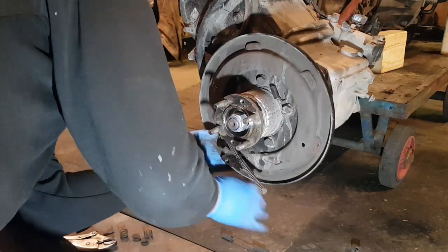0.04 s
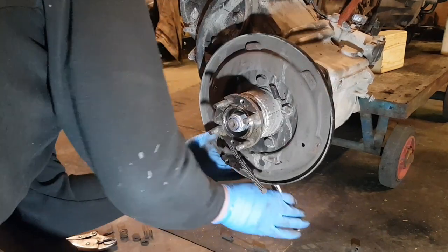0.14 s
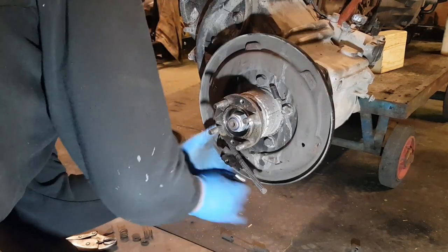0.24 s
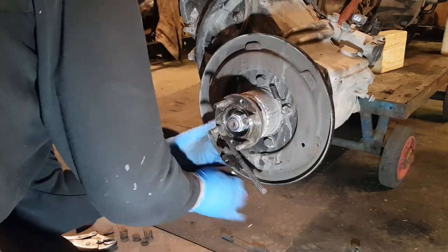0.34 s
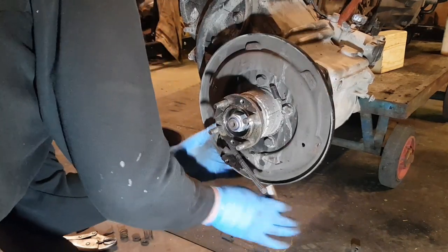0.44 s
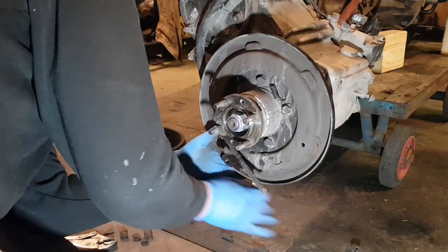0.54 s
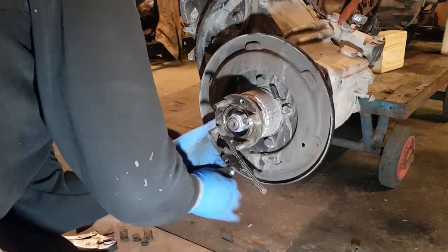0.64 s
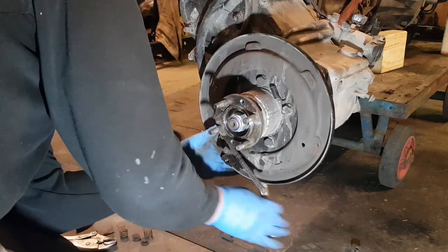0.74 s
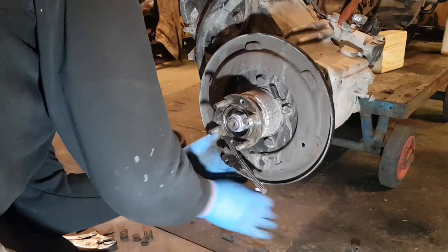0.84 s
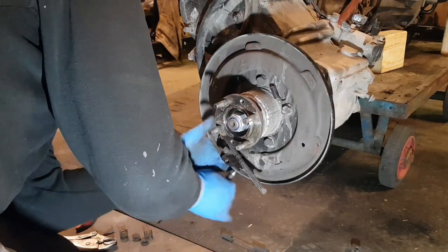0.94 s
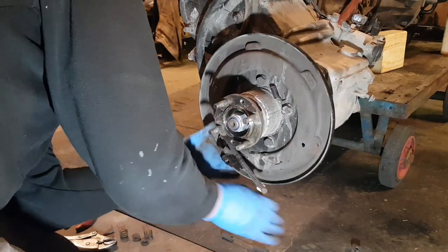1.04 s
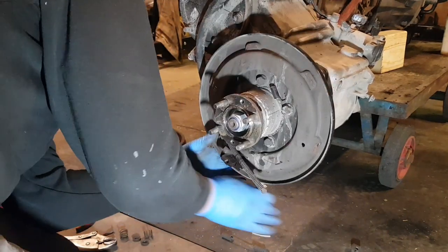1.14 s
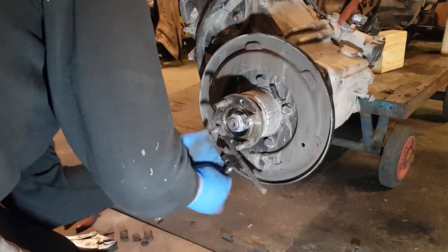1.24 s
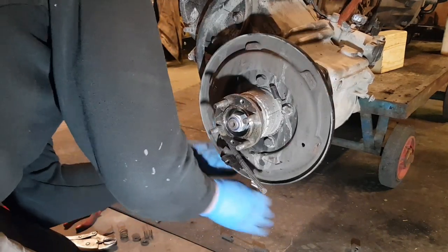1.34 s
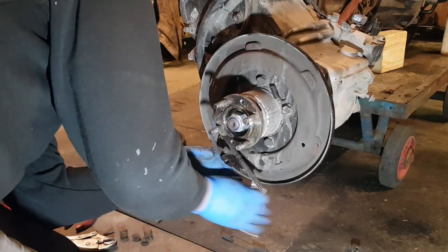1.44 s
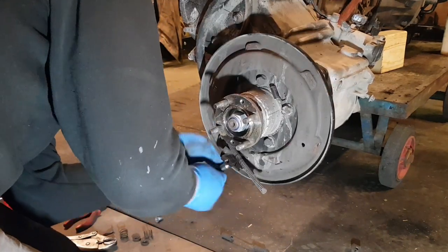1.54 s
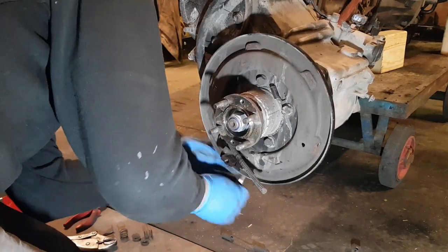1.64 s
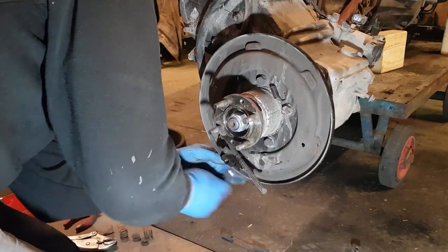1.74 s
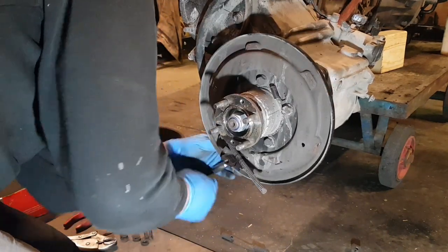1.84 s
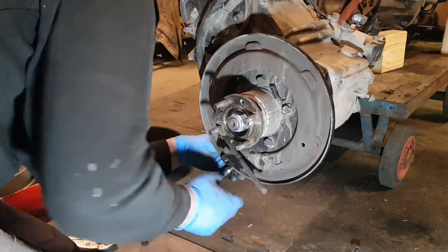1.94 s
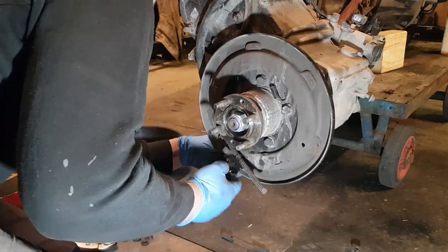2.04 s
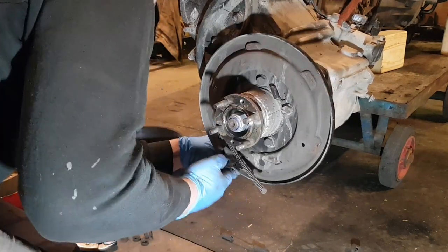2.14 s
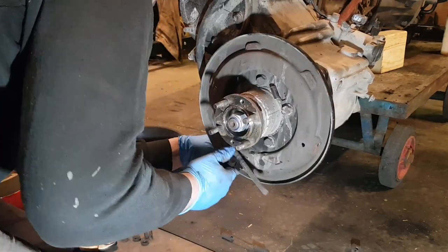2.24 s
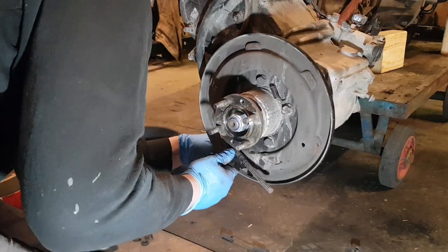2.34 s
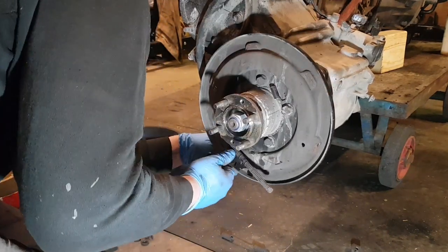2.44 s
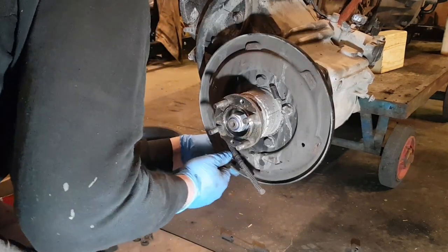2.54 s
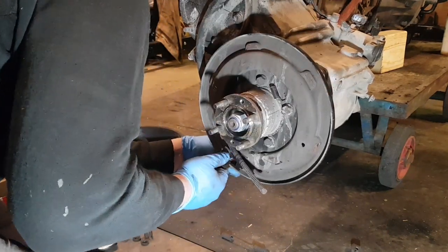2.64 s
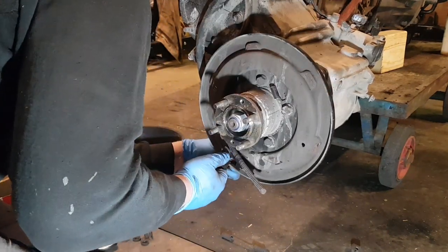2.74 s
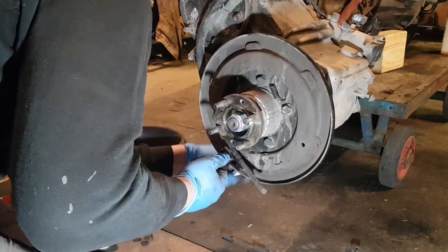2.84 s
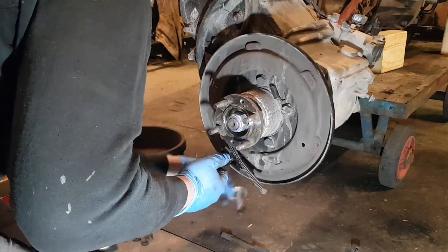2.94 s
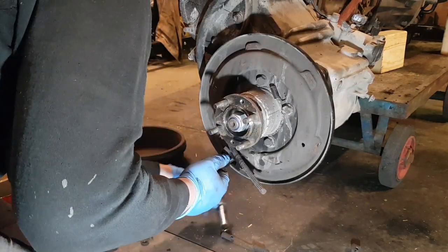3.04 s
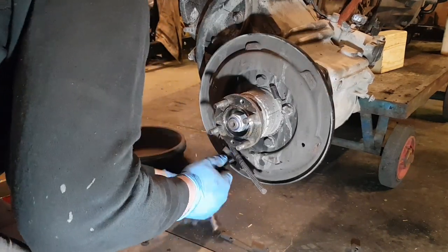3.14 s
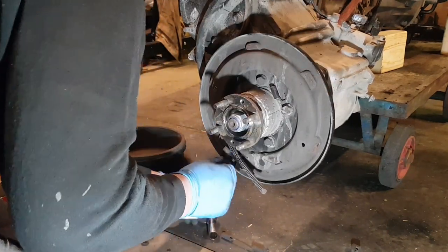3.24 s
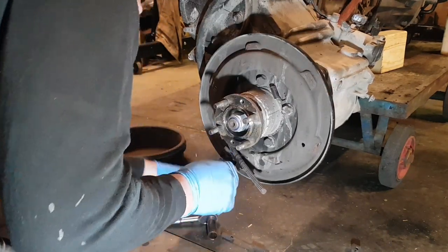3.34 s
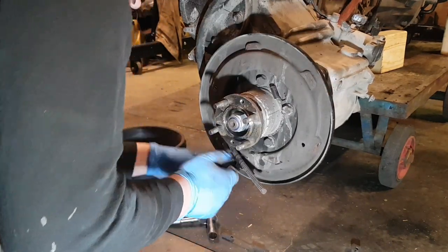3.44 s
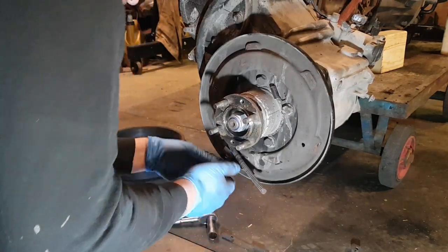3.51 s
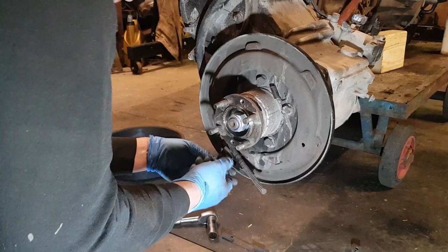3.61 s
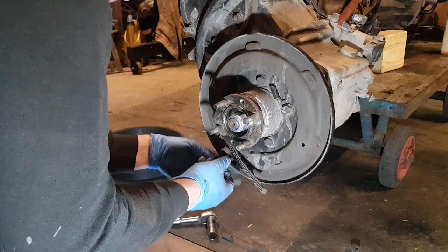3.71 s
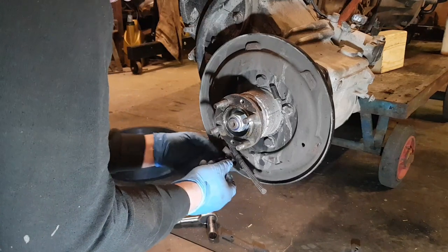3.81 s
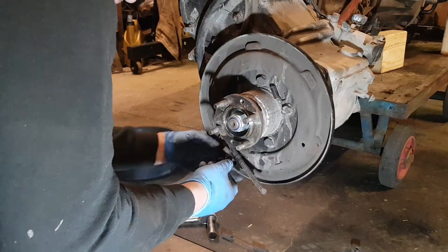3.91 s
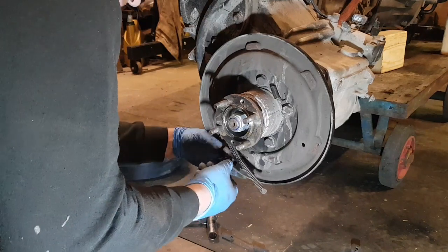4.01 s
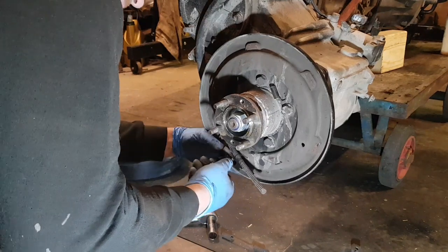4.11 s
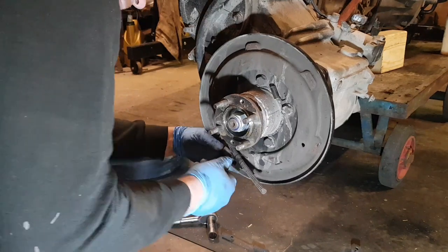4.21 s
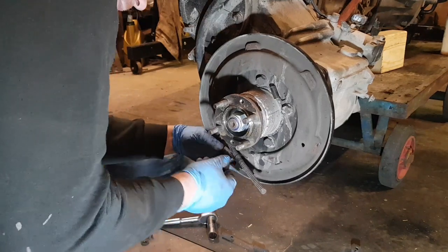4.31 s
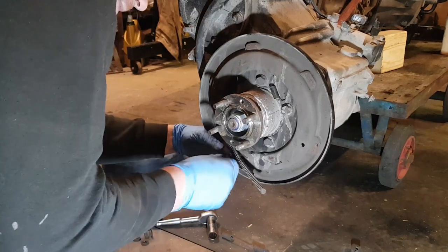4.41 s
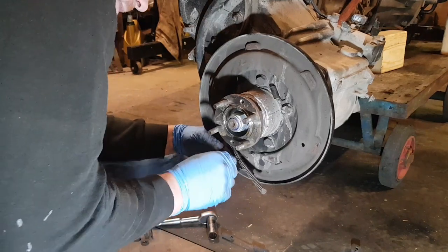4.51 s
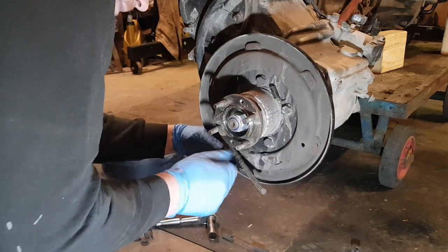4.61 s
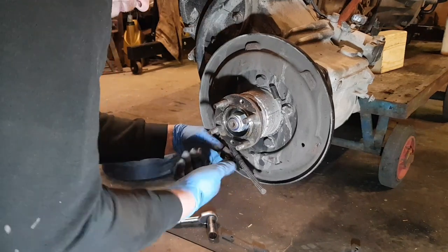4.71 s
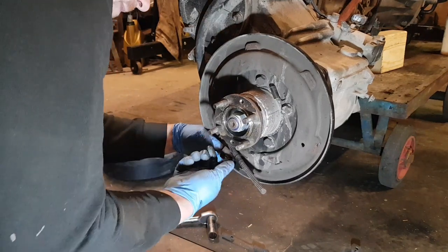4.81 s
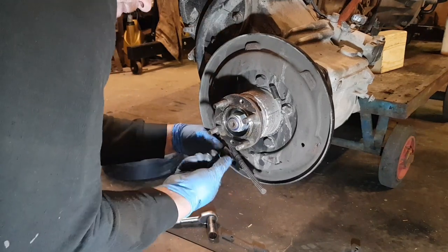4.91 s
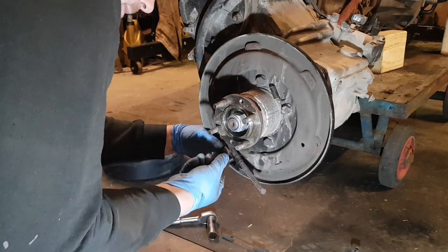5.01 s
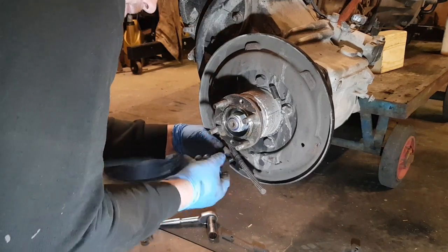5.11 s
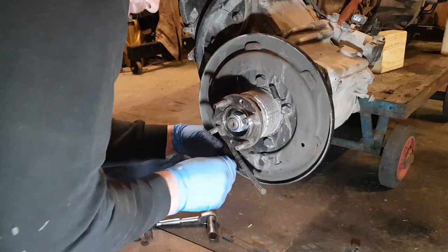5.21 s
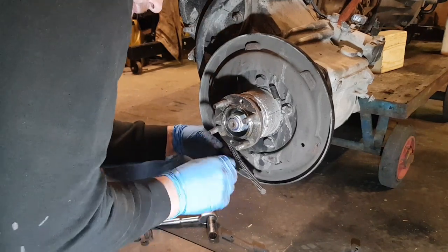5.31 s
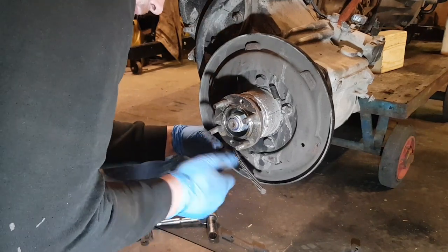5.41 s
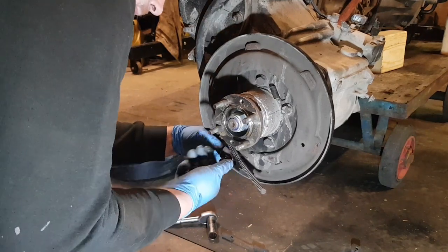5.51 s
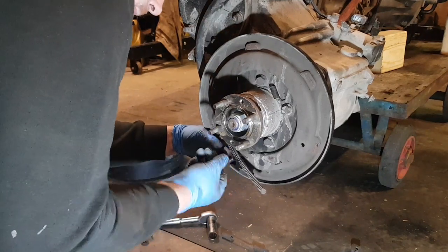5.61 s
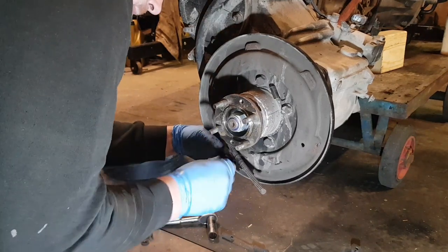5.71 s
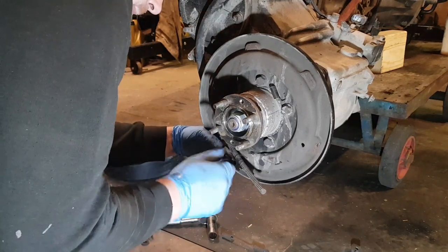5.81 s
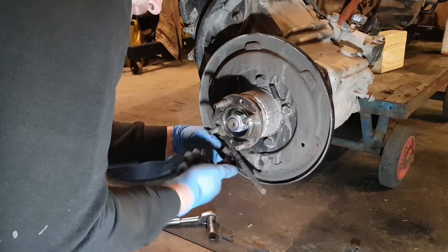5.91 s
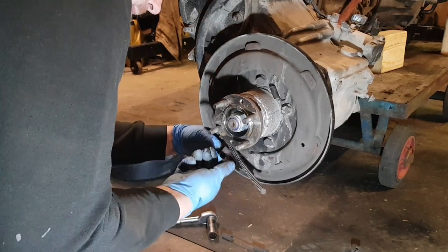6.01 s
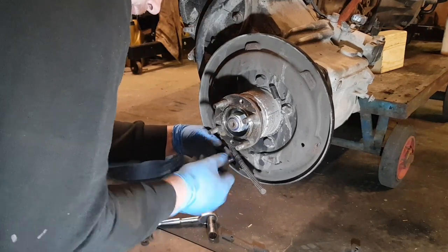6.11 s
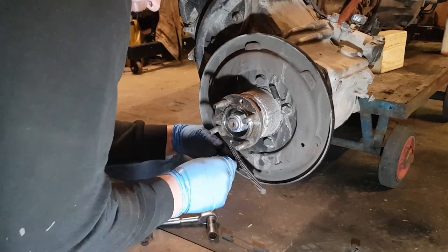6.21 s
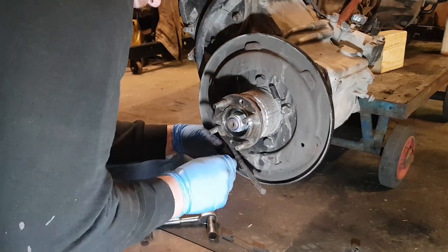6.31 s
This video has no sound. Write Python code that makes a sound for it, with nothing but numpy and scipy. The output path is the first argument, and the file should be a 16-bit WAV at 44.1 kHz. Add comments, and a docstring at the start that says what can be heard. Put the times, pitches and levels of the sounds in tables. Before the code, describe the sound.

Uneven steel knocks and short rusty scrapes come first, mixed with rubbing rubber gloves and small snaps. A tight creak climaxes in the hardest knock, then a thin ringing slip. After a short lull the heavy tool clatters down on the concrete floor. Lesser clicks follow, fading into light fingering and soft rustles. Close stereo microphone, short garage reverberation, steady low building rumble and faint hum beneath.

```python
"""A drum brake in a garage, heard close in stereo and slightly to the right, over a low rumble and a faint hum.
First a gloved hand works a spanner on the stiff adjuster: knocks and scrapes ring the steel back plate's modes.
The thread creaks in thin resonances, the plate hoots, and the spanner slips off with a ping of its own modes.
It is laid on the concrete floor with thuds, rattles and clashes of shaped noise; a few lesser knocks follow.
Then fingers turn the adjuster quietly. Gloves rustle throughout in fine grains, sleeves now and then in dull noise."""
import sys
import numpy as np
from scipy import signal
from scipy.fft import rfft, irfft, next_fast_len
from scipy.io import wavfile

SR = 44100
rng = np.random.default_rng(int(sys.argv[2]) if len(sys.argv) > 2 else 0)


def transcribe(signal):
    """Save signal, clipped to [-1, 1], as a 16-bit WAV file at the path in sys.argv[1]."""
    frames = np.atleast_2d(signal).T
    limited = np.clip(frames, -1, 1)
    pcm = np.round(limited * 32767).astype(np.int16)
    wavfile.write(sys.argv[1], SR, pcm)


N = 280035
TIME = np.arange(N) / SR   # seconds
CUTOFF_HZ = 15600
CLONK_HZ = 778   # the plate's main mode
SWELL_SHAPE = 1.3   # a movement swells and fades as a half sine raised to this power
FINGERING_BRIGHT_DB = 6   # light fingertips sound thinner: taken off the lows and added to the highs

# All spectra are relative.
# Room rumble running out into faint hiss. Each row: frequency in Hz, density in dB per Hz.
RUMBLE = [(15, -45.5), (28, -25.5), (40, -14.5), (58, 0.5), (80, -9), (110, -3), (140, -19), (200, -22),
          (300, -28.5), (500, -35), (800, -36), (1200, -44.5), (2000, -46), (5000, -59.5), (9000, -55),
          (12500, -53), (16000, -59)]
# The rumble comes up at first, then holds. Each row: time in seconds, relative level in dB.
RUMBLE_DB = [(0.0, -55.5), (0.75, -51), (3.3, -50.5), (6.35, -51.5)]
# Two hum tones, lower and upper. Each row: frequency in Hz, level in dB.
HUM = [(62.5, -59.5), (161, -68.5)]
# Swells of the upper hum. Each row: start in seconds, end in seconds, level in dB relative to its HUM row.
HUM_SWELLS = [(2.05, 2.37, 12), (4.2, 4.55, 8.5), (5.75, 6.02, 16.5), (6.05, 6.35, 11.5)]
# How alike the two channels are. Each row: frequency in Hz, left-right correlation.
LIKENESS = [(30, 1), (100, 0.96), (250, .8), (700, 0.51), (2000, 0.026), (5000, 0), (14000, 0.15)]
# The garage's decay. Each row: frequency in Hz, t60 in seconds.
GARAGE = [(150, 0.34), (500, 0.38), (1500, 0.35), (4000, 0.41), (14000, 0.21)]

# Dull, low rustle. Each row: frequency in Hz, density in dB per Hz.
CLOTH = [(60, -16.5), (130, 1.5), (200, -1), (320, -4.5), (600, -19.5), (1500, -32), (6000, -51)]
# Dull low swells: sleeves shifting, and at 3.12-3.48 s the low body of the tool's landing.
# Each row: start in seconds, end in seconds, level in dB.
DULL_SWELLS = [(0.75, 1.75, -56), (3.12, 3.48, -53.5), (4.3, 4.75, -65.5), (4.75, 5.15, -63.5),
               (5.7, 6.15, -68)]
SLEEVE_REST_DB = -76.5

# Rubbing glove rubber. Each row: frequency in Hz, density in dB per Hz.
RUSTLE = [(300, -8.5), (1000, -6.5), (2500, -2), (3700, -1.5), (4800, 2), (7000, 0.5), (9500, 0),
          (12000, 1.5), (14500, -3.5), (16000, 2.5)]
# The gloves' constant light rubbing wavers while the spanner is worked and drops once it is off.
# Each row: time in seconds, relative level in dB.
GRIP = [(0.0, -59.5), (0.7, -62.5), (1.1, -58.5), (1.8, -60), (2.55, -62), (2.75, -75), (3.1, -70),
        (3.5, -65.5), (4.2, -71), (6.35, -72)]
# Fingers slide to a new grip without moving the steel.
# Each row: start in seconds, end in seconds, relative level in dB.
REGRIPS = [(0.223, 0.354, -60.5), (1.795, 1.966, -60.5), (2.147, 2.259, -55), (2.548, 2.6, -54),
           (3.9, 4.058, -62.5), (5.29, 5.483, -67), (5.84, 5.973, -55.5)]
# Glove rubber snaps. Each row: time in seconds, relative level in dB.
SNAPS = [(0.747, -38), (1.3573, -36), (1.3862, -32), (1.6095, -44.5), (2.046, -43), (2.0763, -41),
         (2.0897, -30), (4.306, -46), (4.9167, -48), (4.941, -51.5), (5.3689, -51)]

# The tool lands on the floor. Each row: time in seconds, then thud, rattle and bright clash in relative dB.
DROPS = [(3.119, -34, -38.5, -69), (3.210, -21, -36.5, -47.5), (3.220, -29, -40, -50),
         (3.326, -30.5, -31, -38.5), (3.397, -54, -52.5, -61)]
# Dull blow on the floor. Each row: frequency in Hz, density in dB per Hz.
THUD = [(100, -11.5), (200, -10), (400, -10.5), (620, 5), (950, 2.5), (1250, 0.5), (1700, -11), (2500, -10),
        (4000, -49.5), (8000, -55.5)]
# Loose parts of the tool. Each row: frequency in Hz, density in dB per Hz.
RATTLE = [(90, -5), (200, 6), (330, -0.5), (500, 8.5), (1400, 7), (2800, -2), (4000, -8.5), (6200, -11),
          (7200, -35), (14000, -41.5)]
# Their bright clash. Each row: frequency in Hz, density in dB per Hz.
CLASH = [(1000, -19.5), (3500, -19), (5000, -29), (7000, 0), (9000, -3), (12000, 3.5), (14000, -2.5),
         (16000, -11)]
# Steel meeting concrete. Each row: frequency in Hz, density in dB per Hz.
TICK = [(300, -5.5), (1000, 8), (2500, 6.5), (4000, -11.5), (6300, -4), (7200, -37), (14000, -26)]
# The heavy tool's damped modes as it lies on the floor.
# Each row: frequency in Hz, relative level in dB, t60 in seconds, left-right difference in dB.
TOOL = [(220, -21.5, 0.2, -6), (528, -8, 0.088, -6.5), (619, -13.5, 0.33, -6.5), (724, -3.5, 0.077, 0),
        (957, -10, 0.15, 3), (1181, -20, 0.2, -1), (1290, -15.5, 0.2, -5.5), (1410, -5, 0.086, 1)]

# The spanner springs free. Each row: time in seconds, relative level in dB.
SLIP = [(2.7934, -31.5)]
# The free spanner's modes.
# Each row: frequency in Hz, relative level in dB, t60 in seconds, left-right difference in dB.
SPANNER = [(1491, -9, .12, -2), (1782, -18, .2, -2), (2520, -9, .16, -2), (2799, -12, .12, -2),
           (2918, -6, .06, -2), (3076, -2, .1, -3), (3488, -12, .19, -2), (3720, -14, .07, -2),
           (4468, -22, .12, -2), (4597, -19, .17, -2), (7074, -29, .14, 0)]
# The slip's dense ring. Each row: frequency in Hz, density in dB per Hz.
PING = [(500, -19), (1000, -18.5), (1600, -5), (2100, -6), (3000, 3.5), (3700, -3), (4200, -17),
        (4700, -5.5), (5300, -30), (7200, -49), (9000, -37)]

# Friction locks on to the plate's main mode.
# Each row: start in seconds, end in seconds, pitch in Hz, relative level in dB.
GROANS = [(2.559, 2.59, 802, -27), (2.612, 2.652, 782.5, -29), (4.091, 4.14, 795.3, -41.5)]
# The adjuster binds and creaks under load. Each row: time in seconds, level in dB.
CREAK = [(2.43, -83.5), (2.47, -58.5), (2.53, -55.5), (2.57, -51), (2.60, -65.5), (2.635, -52.5),
         (2.68, -89.5)]
# Thin resonances of the creak. Each row: frequency in Hz, relative level in dB, t60 in seconds.
CREAK_MODES = [(3400, -6, .03), (5910, -2.5, 0.015), (6900, -10, 0.046), (9650, -10, .03),
               (14280, -6.5, .012)]

# Each stroke of the hand slides steel on the adjuster and drags the glove with it. Each row: start in seconds,
# end in seconds, body in relative dB, grit in relative dB, favoured pitch in Hz, glove in relative dB.
STROKES = [(0.069, 0.177, -45.5, -53.5, 3400, -52), (0.374, 0.518, -47, -51, 1490, -54.5),
           (0.545, 0.673, -51, -56.5, 2430, -57), (0.704, 0.847, -43.5, -54, 3010, -50.5),
           (0.843, 1.01, -54, -66, 2430, -56), (1.025, 1.157, -47, -49, 1490, -49),
           (1.141, 1.318, -51, -56.5, 1490, -52), (1.332, 1.437, -47.5, -53.5, 1490, -48.5),
           (1.432, 1.6, -51.5, -59, 2430, -51), (1.642, 1.74, -49.5, -57.5, 3300, -50.5),
           (1.742, 1.833, -47.5, -63, 2410, -43.5), (2.054, 2.169, -60.5, -55.5, 2180, -50.5),
           (2.276, 2.342, -61, -63, 3070, -56), (2.44, 2.673, -44.5, -59, 3030, -58),
           (2.604, 2.663, -34.5, -44, 1490, -49), (2.658, 2.777, -52, -64, 2830, -85),
           (3.604, 3.761, -55, -57.5, 2570, -72), (3.817, 3.923, -75, -68.5, 3620, -60.5),
           (4.067, 4.147, -54, -65.5, 3100, -62.5), (4.273, 4.36, -61.5, -66.5, 3350, -62.5),
           (4.461, 4.54, -66, -71, 3300, -64.5), (4.572, 4.688, -77, -91.5, 3610, -62),
           (4.9, 5.018, -59.5, -63.5, 3050, -62), (5.679, 5.882, -71, -92.5, 3640, -61),
           (6.027, 6.214, -60.5, -65, 2910, -61)]
# Spanner knocks on the adjuster. Each row: time in seconds, then clonk, hard edge and low thump in relative dB,
# and the favoured pitch of the contact point in Hz.
KNOCKS = [(0.041, -36, -55, -40.5, 2240), (0.122, -32, -43.5, -59, 3400), (0.242, -34, -55.5, -38, 2090),
          (0.411, -43, -58, -65, 2470), (0.582, -21.5, -37.5, -52, 1980), (0.687, -36, -51.5, -37, 2010),
          (0.73, -41, -51, -61, 2590), (0.759, -30, -46.5, -55, 2950), (0.771, -32.5, -48, -53, 2760),
          (0.875, -29, -38.5, -43.5, 2820), (1.005, -17, -39.5, -28.5, 3240), (1.193, -26, -38, -58, 3810),
          (1.299, -22.5, -41, -41.5, 2230), (1.354, -36, -53, -53, 3600),
          (1.417, -20.5, -46.5, -29.5, 2440), (1.491, -25, -42, -33.5, 2430),
          (1.686, -35, -46, -44.5, 3390), (1.703, -31.5, -46.5, -54, 3840), (1.766, -27, -54.5, -55, 2280),
          (1.89, -32.5, -68, -43, 2780), (2.021, -36, -70, -57, 2980), (2.053, -43.5, -59.5, -64, 4600),
          (2.371, -41.5, -62, -71.5, 3233), (2.436, -37.5, -57, -64.5, 2930),
          (2.611, -24.5, -42, -52, 2543), (2.627, -19, -43, -50, 3264), (2.636, -11, -36, -41.5, 2870),
          (2.677, -51, -54.5, -50, 2450), (3.622, -33, -39, -51, 2470), (3.656, -29, -50.5, -41, 2430),
          (3.671, -27.5, -73, -44, 2440), (3.724, -35, -87, -44, 2520), (3.797, -42, -71, -53, 2440),
          (4.097, -36.5, -65, -42, 3620)]
# Back plate modes. Each row: frequency in Hz, relative level in dB, t60 in seconds, left-right difference in dB.
PLATE = [(286.2, -14, 0.036, 1.5), (376.3, -7, .07, -1.5), (449, -12.5, 0.084, -8), (511, -14, 0.052, 9.5),
         (788.8, -0.5, 0.065, -5), (786, -23.5, 0.16, -3.5), (891, -7.5, 0.021, -1.5),
         (1043, -2.5, 0.017, -4.5), (1252, -5.5, 0.015, 1.5), (1481, -9.5, 0.12, -3.5),
         (1992, -12, 0.026, 2.5), (2427, -8.5, .09, -4.5), (2565, -12, .06, -5), (2890, -7.5, 0.014, -5),
         (3090, -23.5, 0.11, -0.5), (3267, -9.5, 0.042, -5), (3680, -17, 0.14, -6.5),
         (4650, -12.5, 0.019, -7.5), (5860, -21.5, 0.059, -7), (7140, -22, 0.098, -2)]
# The plate's crowd of weak, short modes. Each row: frequency in Hz, density in dB per Hz.
CRACK = [(200, -9.5), (400, -7), (600, -14), (1100, 1), (1700, 1.5), (2800, 5), (3600, -2.5), (4100, -4),
         (5000, -9), (8000, -21), (12000, -24.5), (16000, -32)]


def from_db(db):
    """Decibels to gain."""
    return 10 ** (np.asarray(db) / 20)


def rms_one(x):
    """Scale to unit power."""
    return x / np.sqrt(np.mean(x ** 2) + 1e-20)


def level(rows):
    """Gain at every sample from (time, dB) rows."""
    return from_db(np.interp(TIME, *np.transpose(rows)))


def at_hz(points, hz):
    """Read a table on a log-frequency axis."""
    f, value = np.transpose(points)
    return np.interp(np.log(hz + 1), np.log(f), value)


def pan(db):
    """Left and right gains for a level difference."""
    return from_db(np.array([[db], [-db]]) / 2)


def wander(per_s):
    """A smooth random course, spread about 1."""
    knots = rng.standard_normal(1000)
    return np.interp(TIME * per_s, np.arange(len(knots)), knots)


def swells(rows, rest_db):
    """Gain that rests at one level and swells once for each (start, end, dB) row, adding as power."""
    power = np.zeros(N) + from_db(rest_db) ** 2
    for start, end, db in rows:
        span = slice(int(start * SR), int(end * SR))
        arch = np.abs(np.sin(np.linspace(0, np.pi, len(power[span]))))
        power[span] += (from_db(db) * arch ** SWELL_SHAPE) ** 2
    return np.sqrt(power)


def colour(x, spectrum):
    """Give a steady signal a spectrum; rms 1."""
    size = 2 * next_fast_len(N // 2 + 1)
    gain = from_db(at_hz(spectrum, np.fft.rfftfreq(size, 1 / SR)))
    return rms_one(irfft(rfft(x, size) * gain)[..., :N])


def air_noise(spectrum, size):
    """Stereo noise, alike in both channels in the bass and nearly unrelated in the treble."""
    hz = np.fft.rfftfreq(2 * next_fast_len(size // 2 + 1), 1 / SR)
    alike = np.clip(at_hz(LIKENESS, hz), -.99, .99)
    mid, side = rfft(rng.standard_normal((2, 2 * len(hz) - 2)))
    both = np.sqrt(1 + alike) * mid + np.sqrt(1 - alike) * side * [[1], [-1]]
    return rms_one(irfft(both * from_db(at_hz(spectrum, hz)))[:, :size])


def clicks(times, db):
    """One impulse for each contact."""
    out = np.zeros(N)
    out[np.round(np.asarray(times) * SR).astype(int)] = from_db(db)
    return out


def grains(per_s, spread_db):
    """Random tiny contacts of uneven size; rms 1."""
    sizes = from_db(spread_db * np.minimum(rng.exponential(1, N), 4))
    signs = rng.choice([-1, 1], N)
    touching = rng.random(N) < per_s / SR
    return rms_one(sizes * signs * touching)


def ring(force, hz, t60):
    """A unit impulse sets a decaying sine of height 1 ringing."""
    r = from_db(-60 / (t60 * SR))
    w = 2 * np.pi * hz / SR
    return signal.lfilter([0, np.sin(w)], [1, -2 * r * np.cos(w), r * r], force + 1e-18)


def struck(force, modes):
    """Ring a table of modes with one force."""
    out = 0
    for k, (hz, db, t60, side_db) in enumerate(modes):
        out = out + from_db(db) * ring(force, hz, t60) * pan(side_db) * (-1) ** k
    return out


def bursts(times, db, spectrum, t60, first_db=0.0):
    """Each contact wakes a crowd of modes too dense to tell apart; first_db lifts or lowers the first millisecond."""
    out, size = np.zeros((2, N + SR)), SR // 2
    onset = from_db(first_db * np.exp(-TIME[:size] / 0.001))
    fade = np.exp(-np.log(1000) * TIME[:size] / t60) * onset
    for at, gain in zip(np.round(np.asarray(times) * SR).astype(int), from_db(db)):
        out[:, at:at + size] += gain * air_noise(spectrum, size=size) * fade
    return out[:, :N]


def favour(hz, favoured_hz, octaves):
    """How well a contact point couples to a mode, 0-1."""
    return np.exp(-(np.log2(hz / favoured_hz) / octaves) ** 2)


def background(rumble_db, waver, upper_rest_db=-2.0):
    """Low rumble of the building as shaped noise, with a faint hum of two sines whose phase wavers."""
    slow = colour(rng.standard_normal((len(HUM), N)), [(1, 0), (4, 0), (20, -60), (60, -140)])
    low, upper = [np.sqrt(2) * from_db(db) * np.sin(2 * np.pi * hz * TIME + waver * drift)
                  for (hz, db), drift in zip(HUM, slow)]
    rumble = air_noise(RUMBLE, size=N) * level(RUMBLE_DB) * from_db(rumble_db)
    return rumble + low + upper * swells(HUM_SWELLS, upper_rest_db)


def garage(x, build_s):
    """Scattered reflections build up and die away at each band's own rate, the highest treble soonest."""
    t, tail = TIME[:SR * 3 // 4], 0
    white = air_noise([(20, 0), (20000, 0)], size=len(t))
    edges = np.geomspace(90, 18000, 9)
    for low, high in zip(edges, edges[1:]):
        band = signal.sosfilt(signal.butter(2, [low, high], "band", fs=SR, output="sos"), white)
        tail = tail + band * np.exp(-np.log(1000) * t / at_hz(GARAGE, np.sqrt(low * high)))
    tail = tail * (1 - np.exp(-(t / build_s) ** 2))
    return signal.fftconvolve(x, tail / np.sqrt(np.sum(tail ** 2) / 2), axes=1)[:, :N]


def dull_rustle():
    """Low noise swells as thick sleeves shift, and once as the low body of the tool's landing."""
    return air_noise(CLOTH, size=N) * swells(DULL_SWELLS, SLEEVE_REST_DB)


def gloves(per_s, spread_db, rub_db, snap_db, snap_t60, catch_db=2.0, patchy_db=2.5):
    """Rubber rubs in fine grains with every stroke and new grip, catching and shifting colour, and snaps sharply."""
    rub = colour(np.array([grains(per_s, spread_db), grains(per_s, spread_db)]), RUSTLE)
    low = signal.sosfilt(signal.butter(1, 8000, fs=SR, output="sos"), rub)
    fingering = TIME >= CREAK[-1][0]   # the firm grip ends with the creak
    tilt = from_db(patchy_db * wander(per_s=16) - FINGERING_BRIGHT_DB * fingering)
    catching = from_db(catch_db * wander(per_s=100))
    rub = rms_one((low * tilt + (rub - low) / tilt) * catching)
    moves = [(start, end, glove_db) for start, end, *steel, glove_db in STROKES] + REGRIPS
    grip_db = np.interp(TIME, *np.transpose(GRIP))
    s, db = np.transpose(SNAPS)
    snaps = bursts(s, db + snap_db, RUSTLE, snap_t60)
    return rub * swells(moves, grip_db) * from_db(rub_db) + snaps


def laid_down(thud_t60, rattle_t60, clash_t60, first_db, ring_db=-4.5, jiggle_db=4.0, tick_db=6.0, tick_t60=.015):
    """The tool touches the concrete, drops its head, then its handle; its loose parts jiggle after each blow."""
    s, thud, rattle, clash = np.transpose(DROPS)
    tick = bursts(s, rattle + tick_db, TICK, tick_t60)   # the hard contact itself
    body = bursts(s, thud, THUD, thud_t60, first_db) + struck(clicks(s, thud + ring_db), TOOL)
    loose = bursts(s, rattle, RATTLE, rattle_t60) + bursts(s, clash, CLASH, clash_t60)
    jiggle = rms_one(from_db(jiggle_db * wander(per_s=170)))
    return tick + body + loose * jiggle


def slip_off(dense_db, dense_t60, first_db):
    """Out of the adjuster's grip the spanner rings on its own, in clear modes and a dense ping."""
    s, db = np.transpose(SLIP)
    dense = bursts(s, db + dense_db, PING, dense_t60, first_db) * pan(-2.6)
    return struck(clicks(s, db), SPANNER) + dense


def groans(waver, overtone_db):
    """For a moment the slips fall in step with the plate and it hoots: a wavering sine and its octave."""
    out, drift = 0, waver * wander(per_s=130)
    for start, end, hz, db in GROANS:
        phase = 2 * np.pi * hz * (TIME - start) + drift
        swell = np.sin(np.pi * np.clip((TIME - start) / (end - start), 0, 1))
        out = out + from_db(db) * swell * (np.sin(phase) + from_db(overtone_db) * np.sin(2 * phase))
    return out * pan(-3.5)


def creak(per_s, spread_db, catch_db=2.5):
    """The binding thread chatters unevenly in a few thin resonances."""
    out = 0
    for hz, db, t60 in CREAK_MODES:
        catching = from_db(db + catch_db * wander(per_s=44))
        out = out + catching * np.array([rms_one(ring(grains(per_s, spread_db), hz, t60)) for ear in range(2)])
    return rms_one(out) * level(CREAK) * (TIME > CREAK[0][0]) * (TIME < CREAK[-1][0])


def scrape(per_s, spread_db, clump_db, roam_db, focus_db, crack_db):
    """Rusty steel catches and slips in clumps, feeding the plate's modes; each stroke swells and fades."""
    clumps = from_db(clump_db * wander(per_s=110))
    slips = grains(per_s, spread_db) * clumps
    mode_hz = np.array(PLATE)[:, 0]
    is_low = mode_hz < 1300   # body below, grit above
    rings = []
    for k, (hz, db, t60, side_db) in enumerate(PLATE):
        roaming = from_db(db + roam_db * wander(per_s=25))
        rings.append(ring(slips, hz, t60) * roaming * min(1, hz / CLONK_HZ) * (-1) ** (k // 2))
    rings = np.array(rings)
    power = np.mean(rings ** 2, axis=1)
    sides = np.hstack([pan(mode[3]) for mode in PLATE])
    other_slips = grains(per_s, spread_db) * clumps
    crack = colour(np.array([slips, other_slips]), CRACK) * from_db(crack_db) * pan(-1.5)
    out = np.zeros((2, N))
    for start, end, body_db, grit_db, favoured_hz, glove_db in STROKES:
        span = slice(int(start * SR), int(end * SR))
        high = ~is_low * from_db(focus_db * favour(mode_hz, favoured_hz, octaves=0.14))
        body = from_db(body_db) * is_low / np.sqrt(power @ is_low)
        grit = from_db(grit_db) * high / np.sqrt(power @ high ** 2)
        stroke = (sides * (body + grit)) @ rings[:, span] + from_db(grit_db) * crack[:, span]
        out[:, span] += stroke * np.sin(np.linspace(0, np.pi, stroke.shape[1]))
    return out


def knocks(scatter_db, edge_db, clonk_db, thump_db, focus_db, focus_octaves, rise_t60,
           chatter_db, chatter_s, crack_db, crack_t60):
    """Every knock rings the plate; hard contacts feed the high modes, most of all near a favoured pitch."""
    s, clonk, edge, thump, favoured_hz = np.transpose(KNOCKS)
    out = bursts(s, edge + crack_db, CRACK, crack_t60, first_db=6.0) * pan(-1.5)
    # the jaws skid: lesser touches crowd around each main one
    touches = np.clip(s[:, None] + chatter_s * rng.uniform(-.4, 1, (len(s), 4)), 0, TIME[-2])
    for k, (hz, db, t60, side_db) in enumerate(PLATE):
        hard = np.clip(np.log2(hz / 950), 0, 1)   # clonk gives way to edge over one octave
        edge_drive = edge + edge_db + focus_db * favour(hz, favoured_hz, focus_octaves)
        drive = (1 - hard) * (clonk + clonk_db) + hard * edge_drive
        drive = db + (thump + thump_db if hz < 650 else drive)
        # the contact point wanders, which matters least to the main mode
        loose = min(1, 2 * abs(np.log2(hz / CLONK_HZ)))
        force = clicks(s, drive + scatter_db * loose * rng.standard_normal(len(s)))
        touch_db = drive[:, None] + chatter_db + scatter_db * rng.standard_normal(touches.shape)
        force = force + loose * clicks(touches, touch_db)
        # a mode needs a few cycles to spread over the plate
        rung = ring(force, hz, t60) - ring(force, hz, rise_t60 * CLONK_HZ / hz)
        out += rung * pan(side_db) * (-1) ** (k // 2)
    return out


def scene():
    """The brake is close and slightly to the right; the floor sounds more of the room."""
    brake = knocks(scatter_db=5.5, edge_db=-2.5, clonk_db=-0.5, thump_db=-1.0, focus_db=10.5, focus_octaves=0.081,
                   rise_t60=0.0069, chatter_db=-5.5, chatter_s=.009, crack_db=-2.0, crack_t60=0.14)
    brake += scrape(per_s=900, spread_db=4.5, clump_db=5.0, roam_db=4.0, focus_db=10.5, crack_db=-0.5)
    brake += creak(per_s=3500, spread_db=6.5) + groans(waver=0.36, overtone_db=-29.0)
    brake += slip_off(dense_db=-1.5, dense_t60=0.1, first_db=-1.0)
    brake[0] = np.roll(brake[0], 1)   # the left channel hears it one sample later
    floor = laid_down(thud_t60=0.19, rattle_t60=0.35, clash_t60=0.19, first_db=-4.5) * pan(-1.8)
    rustle = gloves(per_s=13000, spread_db=4.0, rub_db=5.0, snap_db=0.0, snap_t60=0.018)
    rustle += dull_rustle()
    room = garage(from_db(-8) * brake + from_db(-3.5) * floor + from_db(-9.5) * rustle, build_s=0.0025)
    return brake + floor + rustle + room + background(rumble_db=-0.5, waver=0.6)


def record(dry):
    """The top is cut steeply by an elliptic low-pass."""
    return signal.sosfilt(signal.ellip(10, .1, 80, CUTOFF_HZ, fs=SR, output="sos"), dry)


dry = scene()
out = record(dry)
transcribe(out)
```